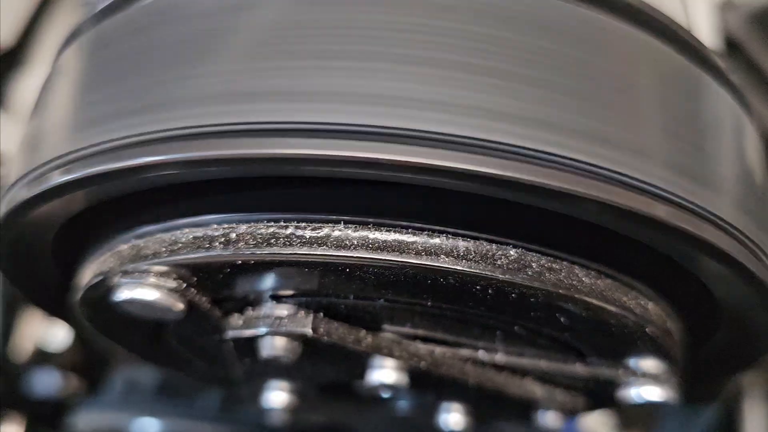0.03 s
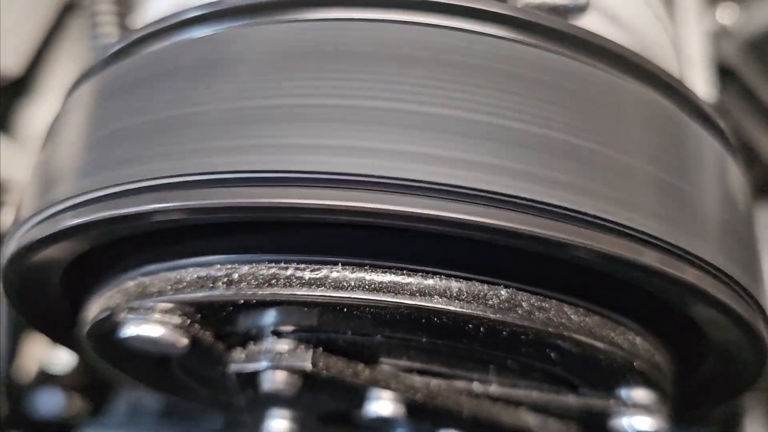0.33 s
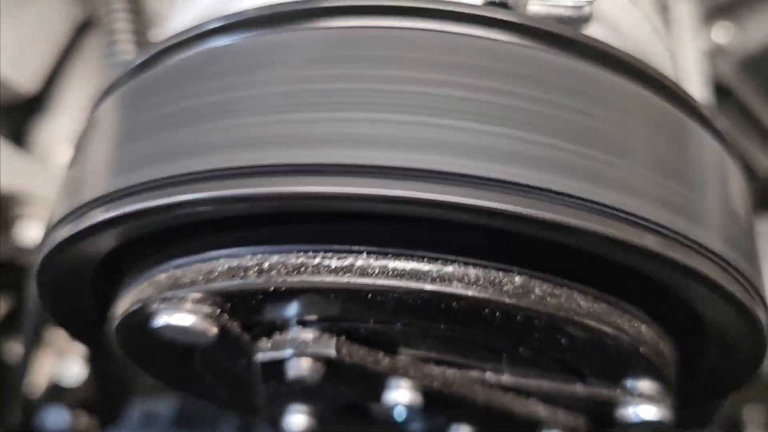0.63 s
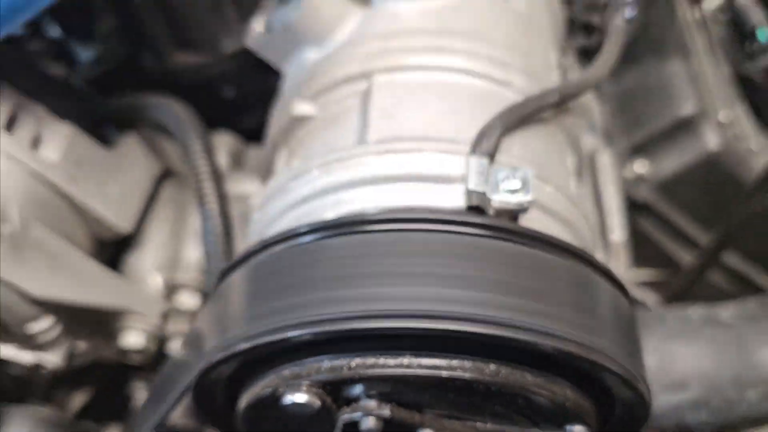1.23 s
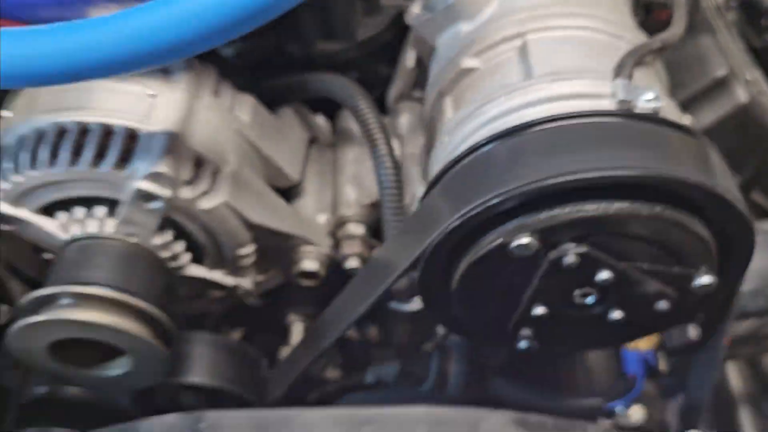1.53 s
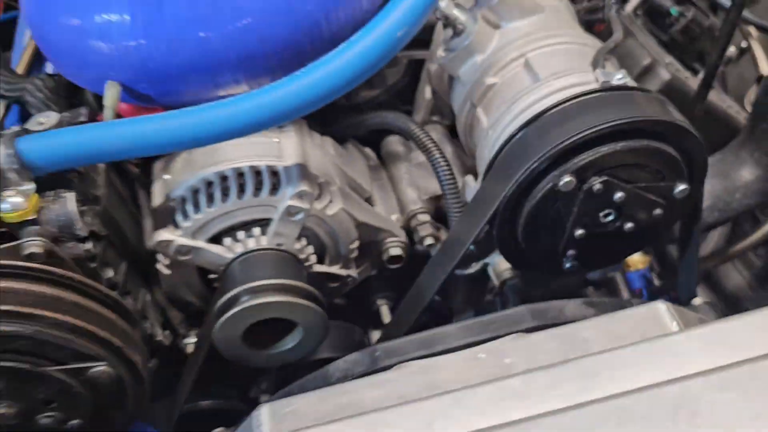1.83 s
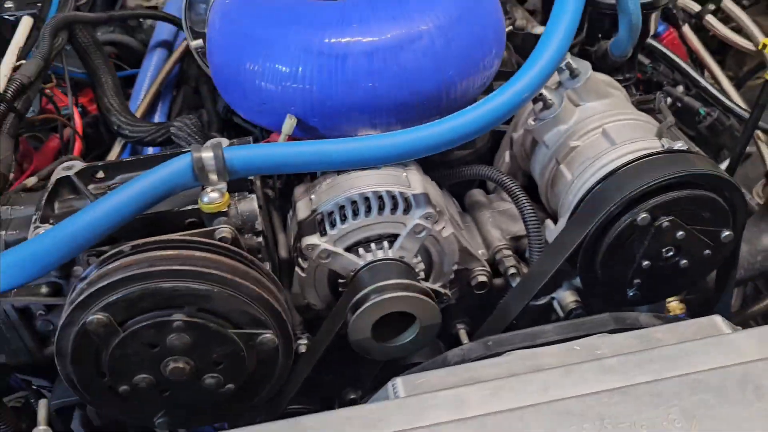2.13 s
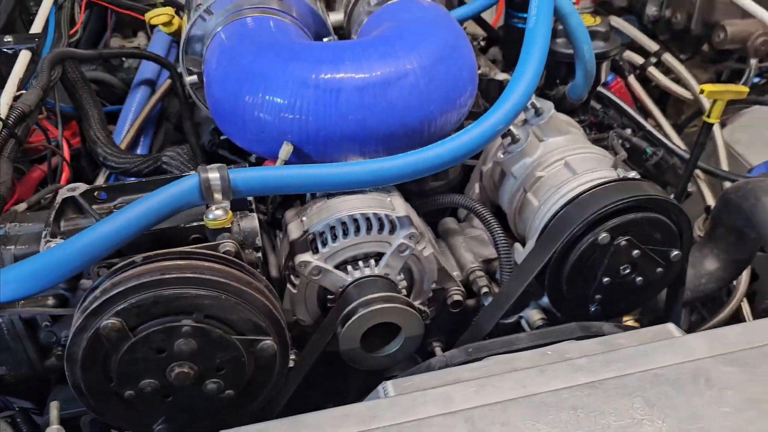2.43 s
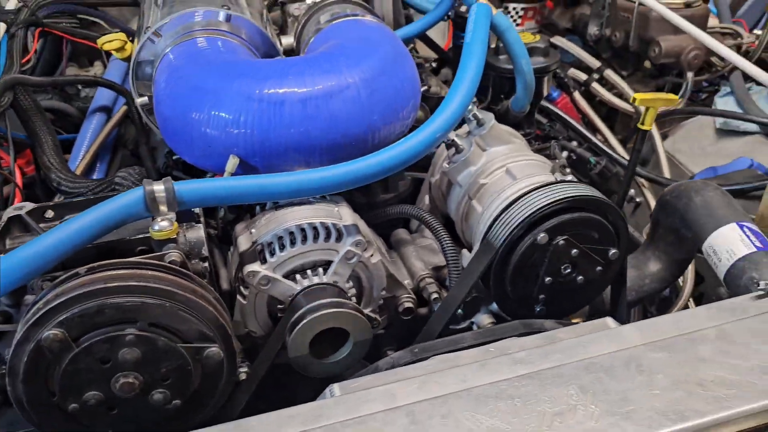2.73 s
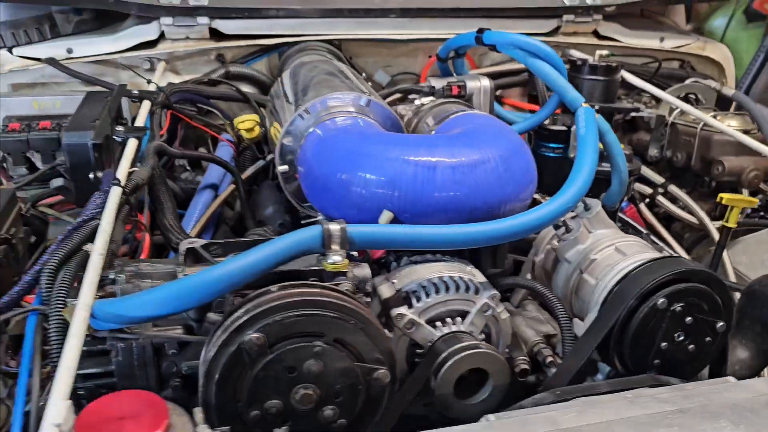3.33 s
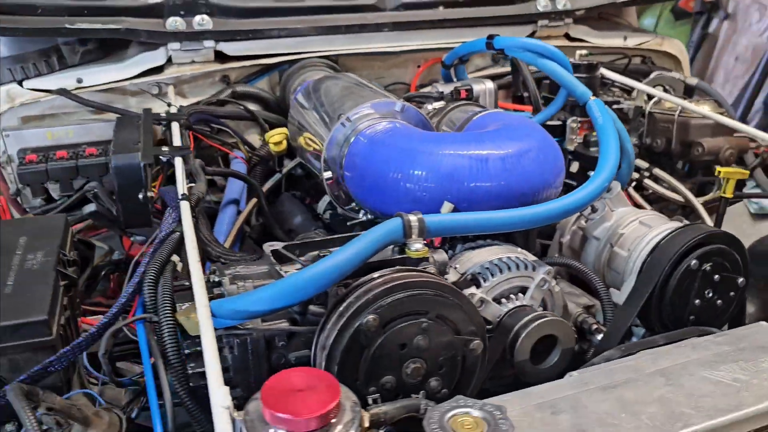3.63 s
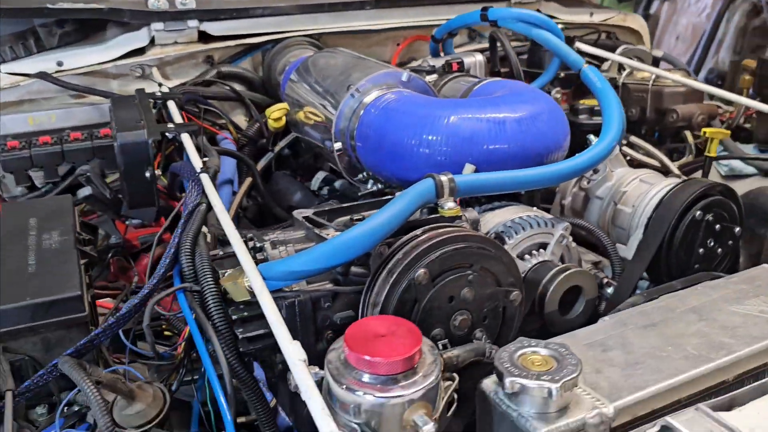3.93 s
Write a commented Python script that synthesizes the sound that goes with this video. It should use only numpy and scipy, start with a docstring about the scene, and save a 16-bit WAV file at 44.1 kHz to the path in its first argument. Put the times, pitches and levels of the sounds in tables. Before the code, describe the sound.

A V8 engine idles throughout with a low, loping throb and faint valve clatter. Its drive belt hisses, ticking and chirping about nine times a second over a light accessory whine, heard from close above the pulleys. From about 1.3 seconds the microphone steps back: hiss and whine soften and the beat evens out. The chirps turn mostly lower, and grow sparser from around 2.8 seconds to the end at 4.

```python
"""A loping throb: a V8 idles under an open bonnet, heard above the front pulleys, then from a step back.
Its two cylinder banks beat unevenly; firings ring the block, and the valves clatter in step with them.
Accessories whine. Friction makes the drive belt hiss, and it ticks and chirps as its flaws slip
over the pulleys, about nine times a second."""
import sys
import numpy as np
from scipy import signal
from scipy.io import wavfile
from scipy.ndimage import uniform_filter1d

SR = 44100
rng = np.random.default_rng(int(sys.argv[2]) if len(sys.argv) > 2 else 0)


def store_pcm(level_fs):
    """Save levels as 16-bit WAV."""
    pcm = np.round(np.clip(level_fs, -1, 1) * 32767).astype(np.int16)
    wavfile.write(sys.argv[1], SR, np.atleast_2d(pcm).T)


N = 176400
CYLINDERS = 8
TICK_ATTACK_S, TICK_LIKENESS, TICK_PAN_DB = 0.00092, 0.17, -0.5

# likeness of the two channels (frequency [Hz], correlation [0 to 1])
COHERENCE = [(270, 0.88), (500, 0.8), (1000, 0.12), (10000, 0)]
# stereo balance (frequency [Hz], left minus right [dB])
BALANCE = [(100, 0.8), (500, 0.6), (1000, -4), (4000, -1), (12000, -1)]
# the listener's step back (time [s], distance [about 0 close, 1 far])
STEP_BACK = [(1.25, -0.05), (1.75, 0.3), (4, 0.52)]
# centres of a tick's low, middle and top ranges (frequency [Hz])
TICK_ZONES_HZ = [2020, 3820, 7460]


def from_db(db):
    """Decibels to amplitude ratio."""
    return 10 ** (np.asarray(db) / 20)


def rms_one(x):
    """Scale to rms 1."""
    return x / np.sqrt(np.mean(x ** 2) + 1e-20)


def in_time(points):
    """Interpolate a curve at every sample."""
    return np.interp(np.arange(N) / SR, *np.transpose(points))


def at_hz(points, hz):
    """Interpolate a spectrum on a log-frequency axis."""
    freqs, values = np.transpose(points)
    return np.interp(np.log(hz), np.log(freqs), values)


def drift(rate_hz):
    """Low-passed noise: a random wander of rms about 1."""
    pole = np.exp(-40 * np.pi * rate_hz / SR)
    slow = signal.lfilter([1], [1, -2 * pole, pole * pole], rng.standard_normal(N // 20 + 2002))[2000:]
    return np.interp(np.arange(N) / 20, np.arange(len(slow)), rms_one(slow))


def third_octaves(low_hz, count):
    """Constant-Q band filters as (centre [Hz], filter sections)."""
    edges = low_hz * 2 ** (np.arange(count + 1) / 3)
    return [(np.sqrt(a * b), signal.butter(2, [a, b], "band", fs=SR, output="sos"))
            for a, b in zip(edges, edges[1:])]


def stereo(pair, hz, likeness=None, pan_db=0):
    """Partial coherence: the sum and difference of two unrelated signals make left and right."""
    if likeness is None:
        likeness = at_hz(COHERENCE, hz)
    side = np.array([[1], [-1]])
    mixed = np.sqrt((1 + likeness) / 2) * pair[0] + side * np.sqrt((1 - likeness) / 2) * pair[1]
    return mixed * from_db(side * (at_hz(BALANCE, hz) + pan_db) / 2)


def impulses(times, gains):
    """One impulse at each time."""
    return np.bincount(np.clip(times * SR, 0, N - 1).astype(int), gains, N)


def ring(x, hz, t60):
    """Damped oscillator: a unit impulse starts a decaying sine of height 1."""
    r, w = from_db(-60 / (t60 * SR)), 2 * np.pi * hz / SR
    return signal.lfilter([0, np.sin(w)], [1, -2 * r * np.cos(w), r * r], x + 1e-18)


def beats(cycle, count):
    """Times and places in the cycle of an event that recurs count times a cycle."""
    step = np.floor(cycle * count).astype(int)
    at = np.flatnonzero(np.diff(step)) + 1
    return at / SR, step[at] % count


def exhaust_throb(cycle):
    """Fourier series: uneven beats from two banks repeat each cycle, so they sound at its harmonics."""
    # exhaust beats in firing order: (bank [0 or 1]) and (strength [dB]); they set the harmonics' phases
    firing_bank = [0, 0, 1, 0, 1, 1, 0, 1]
    beat_db = [-10.5, 0, 1, -7, -2, -2, -6, -2.5]
    # harmonics as the pipes weight them (order [per cycle], level at mid-scene [dB])
    harmonics = [(5, -40), (8, -21), (11, -22), (12, -36), (13, -25), (14, -35), (15, -26), (16, -24.5),
                 (18, -40), (19, -42), (21, -39), (24, -39), (27, -46), (29, -45), (35, -46), (37, -46),
                 (40, -45)]
    lead_cycles = 0.036 * (1 - np.array(firing_bank))   # bank 0 arrives early
    place = np.arange(CYLINDERS) / CYLINDERS - lead_cycles
    from_middle_s, out = (np.arange(N) - N / 2) / SR, 0
    for order, db in harmonics:
        phase = np.angle(np.sum(from_db(beat_db) * np.exp(-2j * np.pi * order * place)))
        # stepping back evens out the beat: the firing rate and its octave rise, the rest fall
        db_per_s = {CYLINDERS: 1.2, 2 * CYLINDERS: 2}.get(order, -0.6)
        waver_db = 0.55 * order / CYLINDERS * drift(4.9)
        level = from_db(db + db_per_s * from_middle_s + waver_db)
        out += level * np.cos(2 * np.pi * order * cycle + phase)
    return np.sqrt(2) * out * from_db(np.array([[1], [-1]]) * BALANCE[0][1] / 2)


def engine_block(cycle):
    """Impact excitation: each firing rings the block, over a dull noise pulsing at the firing rate."""
    # running noise (frequency [Hz], relative density [dB])
    spectrum = [(40, -5), (105, 1.5), (135, -3), (230, -4.5), (305, -5.5), (350, -17), (480, -11),
                (580, -16.5), (850, -19.5), (1500, -35)]
    # modes of block and covers (frequency [Hz], level [dB], t60 [s])
    modes = [(467, -32.5, 0.08), (512, -33, 0.06)]
    # each cylinder's knock, in firing order (relative strength [dB])
    cylinder_db = [-0.5, 2, -0.5, -1, -1, 4.5, 0, -0.5]
    lead_cycles, scatter_db, jitter_s = 0.05957, 1.5, 0.0004
    times, cylinder = beats(cycle + lead_cycles, CYLINDERS)
    white, noise, knocks = rng.standard_normal((2, 2, N)), 0, 0
    for k, (hz, sos) in enumerate(third_octaves(28, count=19)):
        noise += from_db(at_hz(spectrum, hz)) * stereo(signal.sosfilt(sos, white[k % 2]), hz)
    for hz, db, t60 in modes:
        pair = []
        for _ in range(2):
            force = from_db(np.array(cylinder_db)[cylinder] + rng.normal(0, scatter_db, len(times)))
            strikes = impulses(rng.normal(times, jitter_s), rms_one(force))
            pair.append(ring(strikes, hz, t60))
        knocks += from_db(db) * stereo(pair, hz)
    pulse = from_db(-2.8 * np.cos(2 * np.pi * CYLINDERS * cycle))
    return knocks + from_db(-30) * rms_one(noise * pulse)


def accessory_whine(cycle):
    """Rotational tones: belt-driven accessories follow engine speed, wavering as the belt slips."""
    # accessory tones (order [per cycle], close level [dB])
    tones = [(13.7, -38), (24.7, -44), (121.7, -47), (131.5, -51)]
    slip, waver_hz, flutter_db = 0.011, 12, 3
    swell_hz, crest_s = 2.3, 1.75
    swell_db = 2.5 * np.cos(2 * np.pi * swell_hz * (np.arange(N) / SR - crest_s))
    distance_db, out = -6 * in_time(STEP_BACK), 0
    for order, db in tones:
        slipped_cycle = np.cumsum(np.gradient(cycle) * (1 + slip * drift(waver_hz)))
        level = from_db(db + swell_db + distance_db + flutter_db * drift(waver_hz))
        out += np.sqrt(2) * level * np.sin(2 * np.pi * order * slipped_cycle)
    return out


def belt_hiss():
    """Friction noise: the belt rubs on the pulleys; its lows and highs fade as the listener steps back."""
    # hiss from close by (frequency [Hz], relative density [dB])
    spectrum = [(500, 4), (880, 6), (1150, 1), (2100, 2.5), (2700, -1.5), (4300, -3.5), (5800, -8),
                (7500, -3), (8600, -6), (15500, -9)]
    # change at distance 1 (frequency [Hz], gain [dB])
    distance_loss = [(800, -13.5), (1800, -0.5), (4500, -4.5), (9500, -10)]
    distance, flicker_db = in_time(STEP_BACK), 2
    white, out = rng.standard_normal((2, 2, N)), 0
    for k, (hz, sos) in enumerate(third_octaves(445, count=16)):
        db = at_hz(spectrum, hz) + distance * at_hz(distance_loss, hz) + flicker_db * drift(21)
        out += from_db(db) * stereo(signal.sosfilt(sos, white[k % 2]), hz)
    return from_db(-34.5) * rms_one(out)


def valve_clatter(cycle):
    """Impact noise: sixteen valves close in turn, each with a faint burst of its own strength."""
    decay_s, scatter_db = 0.0031, 1.5
    times, valve = beats(cycle, count=16)
    force_db = rng.normal(0, scatter_db, 16)[valve] + rng.normal(0, scatter_db, len(times))
    strikes = impulses(times, rms_one(from_db(force_db)))
    envelope = signal.lfilter([1], [1, -np.exp(-1 / (decay_s * SR))], strikes + 1e-18)
    band = signal.butter(1, [1400, 8000], "band", fs=SR, output="sos")
    return from_db(-42) * signal.sosfilt(band, envelope * rng.standard_normal((2, N)))


def pulley_resonance(x):
    """Forced vibration: pulleys and brackets reinforce sound near their natural frequencies."""
    # their modes (frequency [Hz], bandwidth [Hz], added gain [ratio])
    modes = [(2050, 57, 0.38), (4070, 122, 0.5), (4780, 450, 0.6), (7520, 600, 0.52)]
    return x + sum(gain * signal.lfilter(*signal.iirpeak(hz, hz / width, fs=SR), x)
                   for hz, width, gain in modes)


def belt_slips():
    """Transient excitation: the slips of belt flaws on the pulleys, which drive ticks and chirps."""
    # (time [s], relative level [dB], chirp pitch [Hz], low knock share [dB], top snap share [dB])
    slips = [(0.061, -14, 4530, -17, -28), (0.1462, -9, 4060, -11, -14), (0.191, -16.5, 4070, -26, -20),
             (0.246, -19), (0.2653, -15, 2050, -17, -23), (0.3636, -3, 4120, -29, -31.5),
             (0.4753, -8.5, 4240, -16, -15), (0.573, -18), (0.5922, -5.5, 4080, -19, -23),
             (0.6942, -9.5, 4120, -24, -29), (0.77, -16.5, 3420, -14, -19.5),
             (0.806, -14.5, 4110, -15.5, -23), (0.861, -18), (0.9305, -10.5, 2500, -22, -30), (1.028, -17),
             (1.0488, -15.5, 2100, -15, -24), (1.1035, -13.5, 3820, -20, -23),
             (1.1376, -11.5, 4790, -10, -17), (1.2463, -12, 3680, -15, -30), (1.3576, -11, 3120, -17, -18),
             (1.474, -9, 2027, -14, -16), (1.693, -16.5, 3470, -18, -20.5), (1.8038, -15, 1670, -14, -12),
             (1.927, -13.5, 2030, -12, -18), (1.9522, -16, 1700, -19, -24), (1.977, -19), (2.025, -19.5),
             (2.084, -20), (2.136, -12.5, 2090, -9.5, -16.5), (2.2509, -11.5, 2430, -11.5, -22),
             (2.262, -18), (2.4618, -10.5, 2150, -15.5, -26), (2.585, -12, 2010, -14, -35),
             (2.6859, -12, 3850, -20.5, -23), (2.8027, -15.5, 1385, -15, -28),
             (3.1324, -16.5, 2200, -11, -24), (3.42, -21), (3.459, -17, 1750, -9, -13),
             (3.5784, -9, 1450, -15, -16.5), (3.679, -20), (3.7947, -12, 4600, -22, -17), (3.812, -20)]
    # faint slips list only time and level, and take the median for the rest
    usual = np.median([row[2:] for row in slips if row[2:]], axis=0)
    return [(*row[:2], *(row[2:] or usual)) for row in slips]


def belt_ticks():
    """Friction burst and reverberation: each slip makes a gritty tick that dies away in the engine bay."""
    # colour common to all ticks (frequency [Hz], gain [dB])
    colour = [(600, -11), (950, -1), (1300, 1.5), (2300, 0), (3200, 1), (4500, 0.5), (7500, -2),
              (14000, -20)]
    hold_s, decay_s, bay_db, bay_decay_s = 0.0023, 0.004, -4.8, 0.018
    gain_db, middle_db, grit_db = 9.5, -14, 2
    times, slip_db, _, knock_db, snap_db = np.transpose(belt_slips())
    age = np.arange(SR // 5) / SR
    burst = np.exp(-np.maximum(age - hold_s, 0) / decay_s)
    bay_tail = from_db(bay_db) * np.exp(-age / bay_decay_s)
    shape = np.minimum(age / TICK_ATTACK_S, 1) * np.hypot(burst, bay_tail)
    grit, out = rng.standard_normal((2, 2, N)) * rms_one(from_db(grit_db * drift(750))), 0
    for k, (hz, sos) in enumerate(third_octaves(445, count=16)):
        low, middle, top = (np.interp(np.log(hz), np.log(TICK_ZONES_HZ), zone) for zone in np.eye(3))
        share_db = low * knock_db + middle * middle_db + top * snap_db
        force = from_db(gain_db + slip_db + share_db + at_hz(colour, hz))
        envelope = signal.oaconvolve(impulses(times, force), shape)[:N]
        out += stereo(signal.sosfilt(sos, envelope * grit[k % 2]), hz, TICK_LIKENESS, TICK_PAN_DB)
    return out


def belt_chirps():
    """Damped oscillation: each slip squeaks at two close pitches whose phases soon wander."""
    gain_db, upper_ratio, upper_db, coherent_cycles = -4.8, 1.16, -8, 13
    age, out = np.arange(SR // 10) / SR, np.zeros((2, N + SR))
    for time, slip_db, pitch, _, _ in belt_slips():
        at = int(time * SR)
        for hz, db in ((pitch, slip_db), (pitch * upper_ratio, slip_db + upper_db)):
            t60 = 0.025 * np.sqrt(TICK_ZONES_HZ[1] / hz)   # low squeaks ring longer
            envelope = np.minimum(age / TICK_ATTACK_S, 1) * from_db(gain_db + db - 60 * age / t60)
            phase_steps = rng.normal(0, np.sqrt(2 * hz / (coherent_cycles * SR)), (2, len(age)))
            wander = uniform_filter1d(np.cumsum(phase_steps, axis=1), size=20, axis=1)
            squeak = np.sin(2 * np.pi * hz * age + wander)
            out[:, at:at + len(age)] += envelope * stereo(squeak, hz, TICK_LIKENESS, TICK_PAN_DB)
    return out[:, :N]


def scene():
    """Superposition: the belt's noises add to the sounds timed by the crankshaft."""
    # idle speed (time [s], crankshaft speed [rpm])
    idle_rpm = [(0, 814), (.5, 814), (.7, 806), (1.1, 805), (1.6, 800), (2.2, 810), (2.75, 800), (3.3, 809),
                (4, 804)]
    cycle = 0.058 + np.cumsum(in_time(idle_rpm)) / (120 * SR)   # a four-stroke cycle takes two turns
    engine = exhaust_throb(cycle) + engine_block(cycle) + accessory_whine(cycle)
    return engine + pulley_resonance(belt_hiss() + valve_clatter(cycle) + belt_ticks()) + belt_chirps()


def record(dry):
    """Band limiting: a steep low-pass cuts the top above 15.9 kHz."""
    return signal.sosfilt(signal.ellip(16, .1, 80, 15900, fs=SR, output="sos"), dry)


dry = scene()
out = record(dry)
store_pcm(out)
```